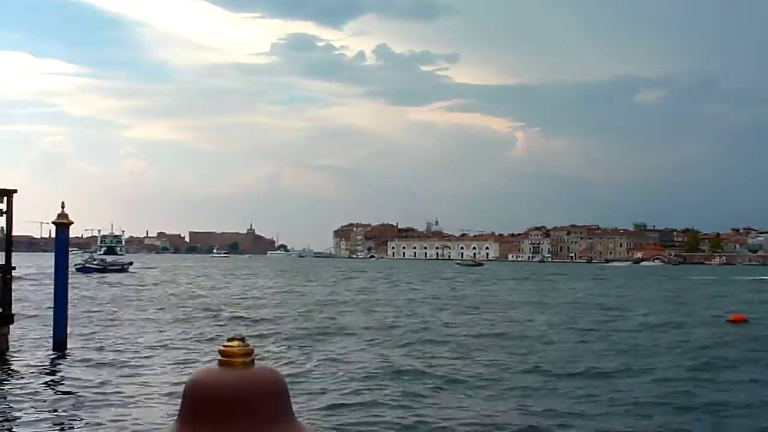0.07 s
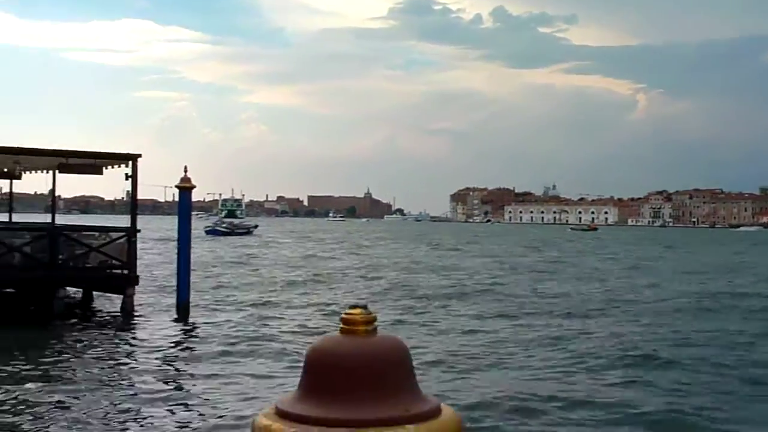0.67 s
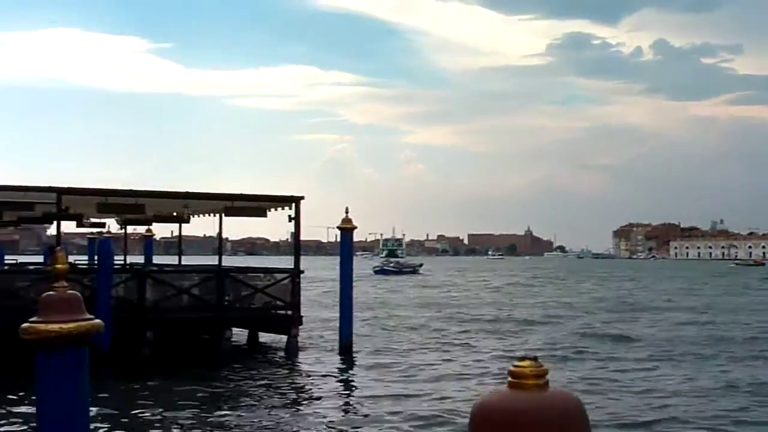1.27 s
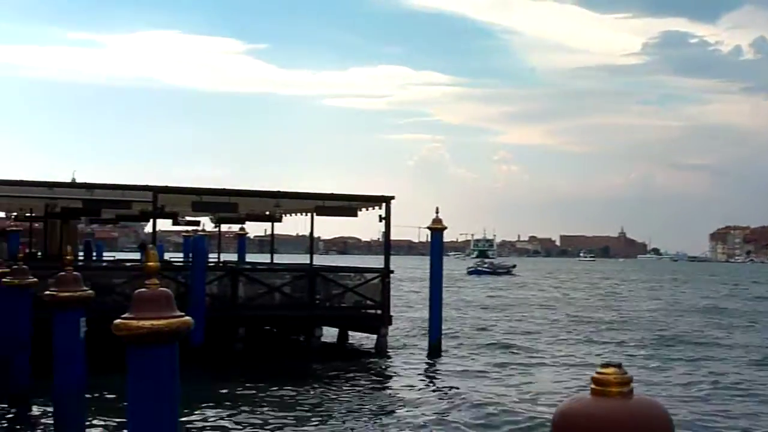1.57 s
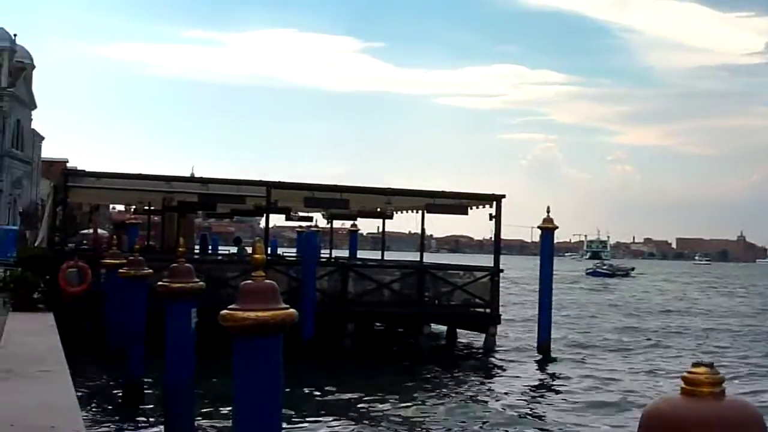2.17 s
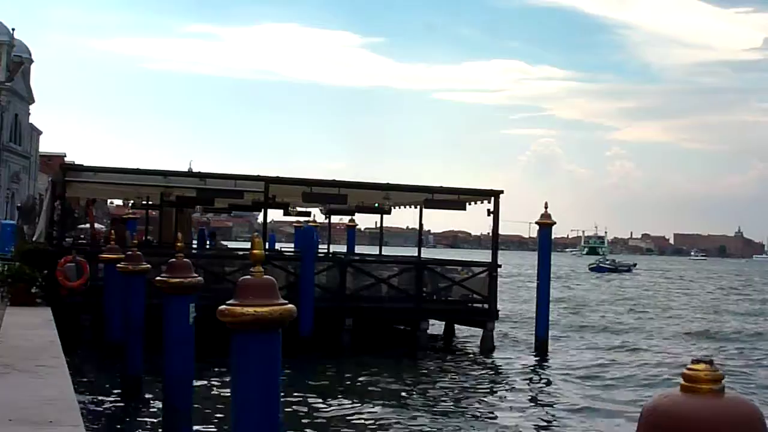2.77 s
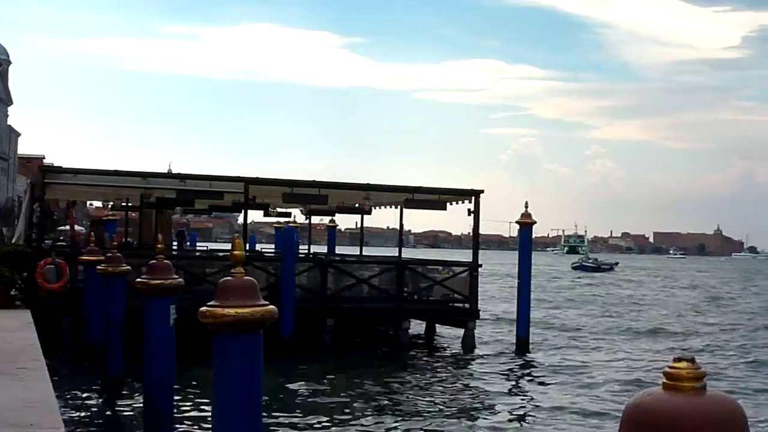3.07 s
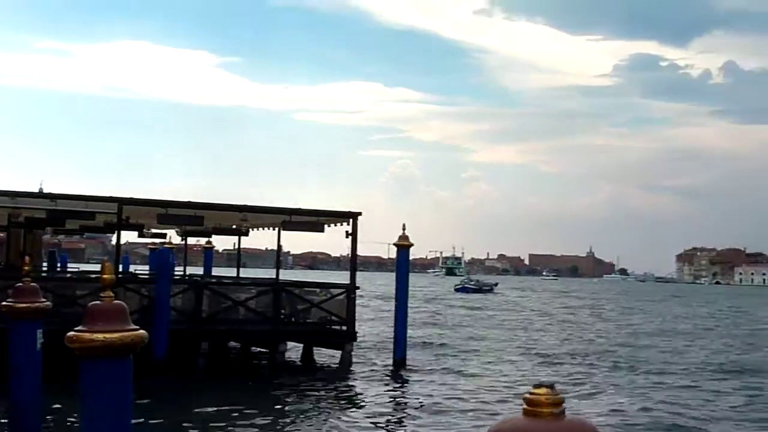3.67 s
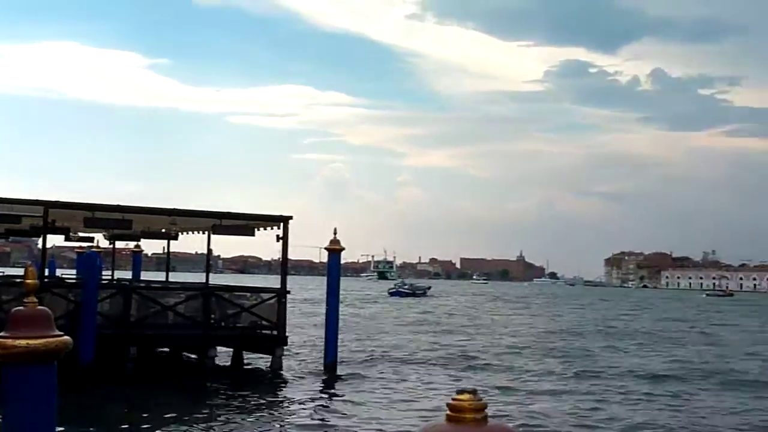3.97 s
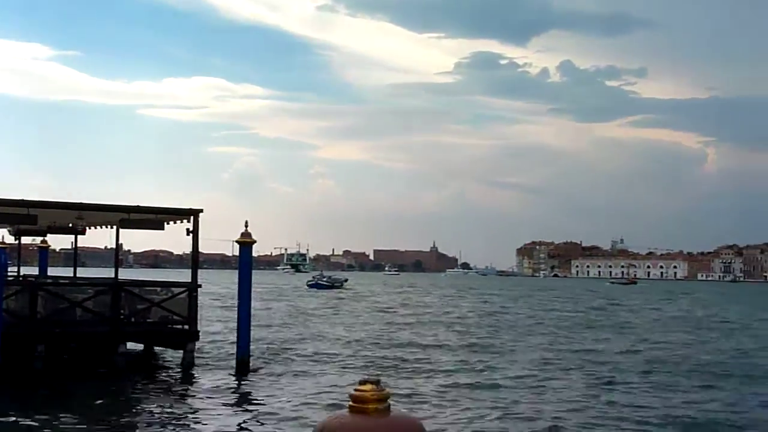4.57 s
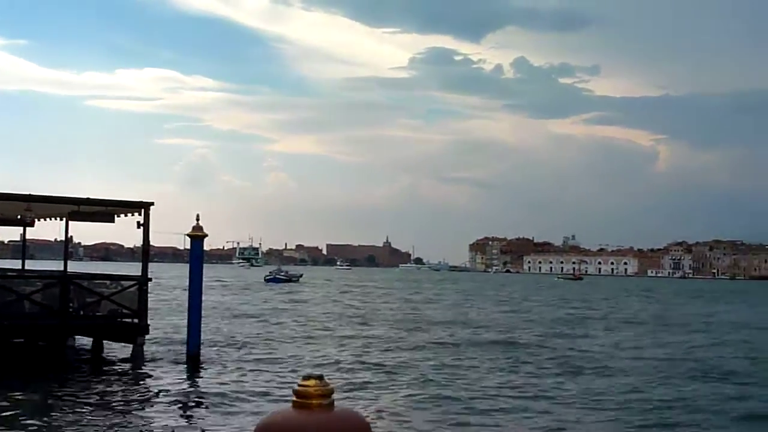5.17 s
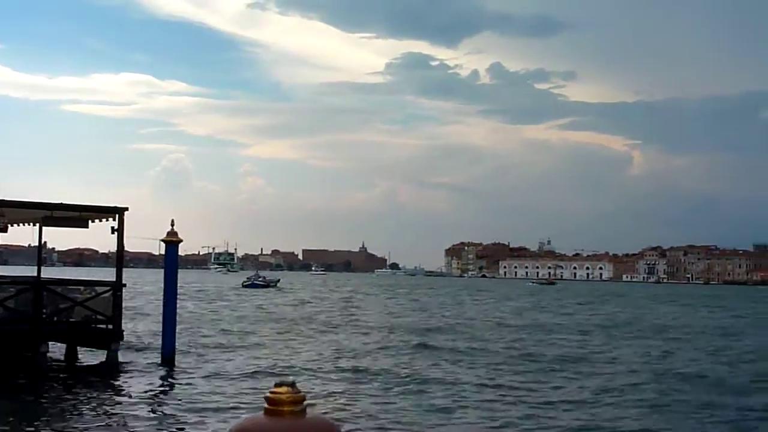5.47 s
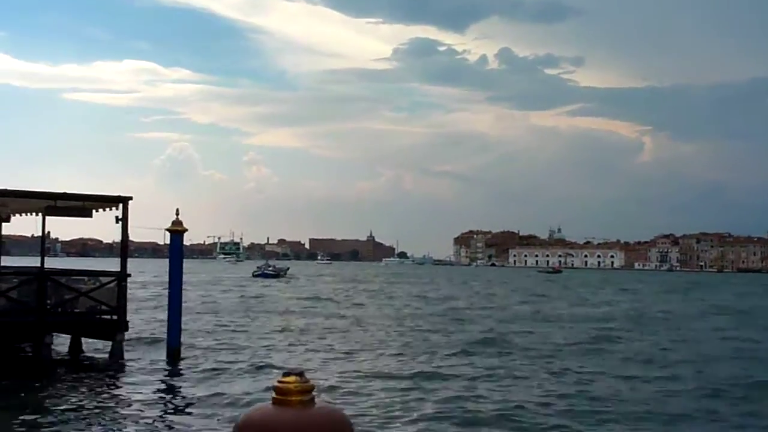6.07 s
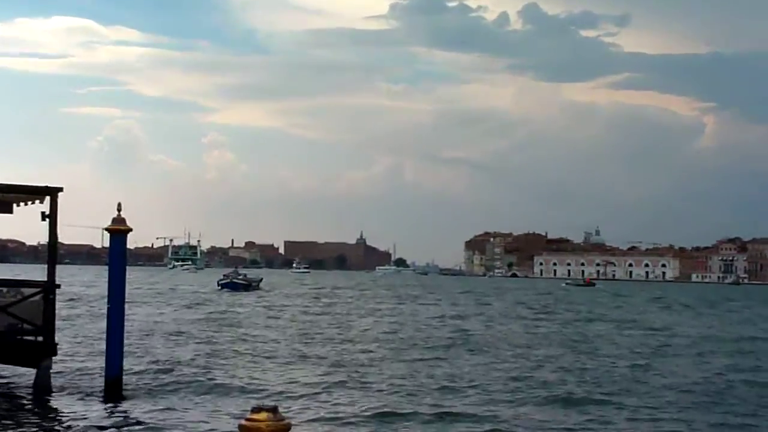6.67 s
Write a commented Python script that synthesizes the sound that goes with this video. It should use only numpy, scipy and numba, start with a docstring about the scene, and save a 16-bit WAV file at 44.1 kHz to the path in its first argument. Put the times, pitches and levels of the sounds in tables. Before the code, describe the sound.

Wind and diesel boats rumble steadily while small waves slap, plop and spatter around a wooden jetty.

```python
"""A quay on a choppy lagoon. From the start, wind and boat traffic rumble behind droning diesels.
About once a second a small wave swells round posts and a jetty and drains away in a haze of tiny
bubbles, with slaps, plops of trapped air and spatters of spray. At 4 s one boat opens its throttle
for a second. Near 6 s come a last cluster of plops and spatters and a louder gearbox whine."""
import sys
import numpy as np
from scipy import signal
from scipy.fft import rfft, irfft
from scipy.io import wavfile
from scipy.ndimage import map_coordinates
from numba import njit

SR = 44100
rng = np.random.default_rng(int(sys.argv[2]) if len(sys.argv) > 2 else 0)


def unload_audio(sound):
    """Save the sound as a 16-bit wav file, at the path given as the first command line argument."""
    columns = np.transpose(np.atleast_2d(sound))
    # keep every value between -1 and 1, then stretch to whole-number steps
    steps = np.round(np.clip(columns, -1, 1) * 32767)
    wavfile.write(sys.argv[1], SR, steps.astype(np.int16))


N = 300321
TIME_S = np.arange(N) / SR


def undb(db):
    """Decibels to gain."""
    return 10 ** (np.asarray(db) / 20)


def unit(x):
    """Scale to rms 1."""
    return x / np.sqrt(np.mean(x ** 2))


def curves(table):
    """Table columns, interpolated linearly in time."""
    times_s, *columns = np.transpose(table)
    return [np.interp(TIME_S, times_s, column) for column in columns]


def colour(x, spectrum):
    """Filter by (f/Hz, level/dB) points; rms 1."""
    hz, db = np.transpose(spectrum)
    bins_hz = np.maximum(np.fft.rfftfreq(N, 1 / SR), 1)
    gain = undb(np.interp(np.log(bins_hz), np.log(hz), db))
    return unit(irfft(rfft(x) * gain, N))


def walk(rate_hz):
    """Smooth random curve, rms 1."""
    steps = rng.standard_normal(size=2048)
    return unit(map_coordinates(steps, [TIME_S * rate_hz], order=3, mode="wrap"))


def add(out, t_s, x):
    """Mix x in at t_s."""
    start = max(int(t_s * SR), 0)
    out[start:start + len(x)] += x[:max(N - start, 0)]


# Roar: t/s, level/dB
ROAR_LEVEL = [(0, -33), (0.7, -30), (1.1, -32.5), (3.3, -31.5), (4.5, -31.5), (5.5, -34), (6.2, -30.5),
              (6.81, -32)]
# Gusts: t/s, level/dB, half-width/s
WIND_GUSTS = [(0.294, -36, 0.14), (1.64, -28, 0.068), (3.137, -34, 0.13), (3.452, -37, 0.11),
              (6.142, -29, 0.04), (6.556, -29.5, 0.041)]
# Spectra: f/Hz, level/dB
ROAR_SPECTRUM = [(10, -48.5), (22, -30), (35, -20), (52, -8.5), (75, -7.5), (103, 0), (135, -2), (190, -6),
                 (260, -6.5), (340, -12.5), (600, -22.5), (3000, -76)]
GUST_SPECTRUM = [(25, -20.5), (55, -14), (100, 0.5), (150, -11.5), (300, -26), (2000, -86.5)]

def rumble():
    """Wind and far engines merge into a low roar; gusts buffet the microphone."""
    level_db, = curves(ROAR_LEVEL)
    roar = colour(rng.standard_normal(N), ROAR_SPECTRUM) * undb(level_db)
    gust_gain = sum(undb(db) * np.exp(-((TIME_S - t_s) / width_s) ** 2) for t_s, db, width_s in WIND_GUSTS)
    return roar + gust_gain * colour(rng.standard_normal(N), GUST_SPECTRUM)


def engine(hz, orders, wander, flutter_db=1.0, flutter_hz=12):
    """Harmonics of a wavering shaft speed; each fades in and out on its way over the water."""
    phase = 2 * np.pi * np.cumsum(hz * (1 + wander * walk(9))) / SR
    out = np.zeros(N)
    for order, db in orders:
        rms = undb(db + flutter_db * walk(flutter_hz))
        out += np.sqrt(2) * rms * np.sin(order * phase + 2 * np.pi * rng.random())
    return out


# Diesel drone: t/s, level/dB
DIESEL_LEVEL = [(0, -41), (0.4, -34.5), (1.8, -35.5), (3.15, -31), (4.2, -32.5), (4.43, -40.5),
                (4.68, -31.5), (5.05, -40), (5.63, -34), (5.9, -42.5), (6.81, -37.5)]
# Firing harmonics: order, level/dB
FERRY_HARMONICS = [(1, -12.5), (2, -13.5), (3, -12.5), (4, -4)]
LAUNCH_HARMONICS = [(2, -19.5), (4, -3.5)]

def diesels():
    """Two diesels with close firing rates beat against each other."""
    level_db, = curves(DIESEL_LEVEL)
    ferry = engine(hz=58.8, orders=FERRY_HARMONICS, wander=0.0029, flutter_db=1.2, flutter_hz=15)
    launch = engine(hz=54.7, orders=LAUNCH_HARMONICS, wander=0.0037)
    return (ferry + launch) * undb(level_db)


# Whine: t/s, level/dB
GEAR_LEVEL = [(0, -59.5), (1.5, -48), (2.5, -50.5), (4.9, -48), (6.4, -39), (6.81, -48)]
# Whine harmonics: order, level/dB
GEAR_HARMONICS = [(1, -2), (2, -11.5), (3, -11.5), (4, -16), (6, -15)]

def gearbox():
    """A gearbox whines at near-constant pitch."""
    level_db, = curves(GEAR_LEVEL)
    return engine(hz=294.6, orders=GEAR_HARMONICS, wander=0.0021, flutter_db=1.5) * undb(level_db)


# Throttle run: t/s, firing f/Hz, level/dB
REV_RUN = [(4.05, 39, -41), (4.2, 42.4, -33.5), (4.32, 46.2, -30), (4.47, 52.93, -27), (4.7, 54.75, -25),
           (4.92, 55.87, -27), (5.1, 55.7, -28.5), (5.22, 56, -38)]
# Firing harmonics: order, level/dB
REV_HARMONICS = [(1, -12.5), (2, -1.5), (3, -13.5), (4, -19)]

def revving_boat():
    """A third engine speeds up, louder for a second."""
    firing_hz, level_db = curves(REV_RUN)
    return engine(firing_hz, REV_HARMONICS, wander=0.006) * undb(level_db)


@njit
def bubbles(samples, start_s, hz, cycles, amplitude, glide):
    """Each bubble rings for its cycles (to -60 dB), rising in pitch as it nears the surface."""
    out = np.zeros(samples)
    for k in range(len(start_s)):
        first, life = int(start_s[k] * SR), int(cycles[k] * SR / hz[k]) + 1
        step_rad = 2 * np.pi * hz[k] / SR
        phasor = amplitude[k] + 0j
        pole = np.exp(1j * step_rad - np.log(1000) / life)
        bend = np.exp(1j * step_rad * glide / life)
        for i in range(first, min(first + life, samples)):
            phasor, pole = phasor * pole, pole * bend
            out[i] += phasor.imag
    return out


def froth(low_hz, high_hz, cycles, spread_db, haze_db, count):
    """Many near bubbles, a few much louder than the rest, over the merged hiss of far ones."""
    when, pitch, ring, rank = rng.random((count, 4)).T
    hz = low_hz * (high_hz / low_hz) ** pitch
    amplitude = undb(-spread_db * np.log(rank + 0.012)) * hz / high_hz
    near = bubbles(N, when * N / SR, hz, cycles * (.5 + ring), amplitude, glide=0.14)
    return unit(near) + undb(haze_db) * rng.standard_normal(N)


# Far chop: t/s, level/dB
CHOP_LEVEL = [(0, -39), (1.28, -35), (2.1, -37.5), (2.9, -36.5), (4.5, -38), (4.95, -42), (5.25, -39.5),
              (5.45, -37.5), (5.8, -38), (6.5, -42), (6.81, -38)]
# Chop filter: f/Hz, level/dB
CHOP_EQ = [(100, -31.5), (270, -3), (350, -3.5), (480, -3), (630, -2), (900, -10), (2000, -19),
           (6000, -37.5), (8000, -57.5)]

def far_chop():
    """The chop further out merges into a dull, steady wash."""
    level_db, = curves(CHOP_LEVEL)
    wash = froth(low_hz=255.5, high_hz=1160, cycles=18, spread_db=2.9, haze_db=16.5, count=5000)
    return colour(wash, CHOP_EQ) * undb(level_db)


def quay_echo(x, echo_db, t60_s):
    """Posts, jetty and quay wall scatter each splash into a short tail."""
    t_s = np.arange(SR // 4) / SR
    tail = rng.standard_normal(len(t_s)) * undb(-60 * t_s / t60_s) * (t_s > .003)
    return x + undb(echo_db) * signal.fftconvolve(x, tail / np.linalg.norm(tail))[:N]


# Falling spray: t/s, peak level/dB, f/Hz
DROPS = [(0.704, -27, 2760), (0.7384, -22.5, 2440), (0.8794, -26.5, 3860), (0.9058, -24, 3100),
         (1.054, -44, 2570), (1.5103, -26.5, 2410), (2.253, -28, 4250), (4.2594, -27, 2950),
         (4.4577, -28, 3020), (6.2395, -25.5, 2900), (6.304, -22.5, 2550), (6.396, -30, 2710),
         (6.445, -26.5, 3430), (6.5323, -30, 2855), (6.572, -22, 2660)]

def spatters(scatter_oct, cycles, decay_s, lesser_db, count):
    """Spray lands as one large drop and a quickly thinning shower of lesser ones."""
    out = np.zeros(N)
    lesser = np.arange(count) > 0
    for t_s, db, hz in DROPS:
        when, pitch, rank = rng.random((count, 3)).T
        start_s = -decay_s * np.log(1 - when) * lesser
        drop_hz = hz * 2 ** (scatter_oct * (2 * pitch - .9) * lesser)
        amplitude = np.where(lesser, undb(lesser_db) * rank * (1 - when / 2), 1)
        shower = bubbles(SR // 4, start_s, drop_hz, np.full(count, cycles), amplitude, glide=.1)
        add(out, t_s, shower * undb(db) / np.abs(shower).max())
    return out


# Air trapped by waves, deep glugs to bright drips: t/s, level/dB, f/Hz
AIR_POCKETS = [(0.282, -24, 676), (0.534, -29, 1460), (0.736, -27, 1410), (0.791, -25, 497),
               (1.009, -24.5, 1085), (1.051, -20, 1730), (1.114, -22.5, 1110), (1.126, -26, 1740),
               (1.161, -25, 1100), (1.252, -24, 1530), (1.293, -18.5, 1370), (1.311, -23.5, 676),
               (2.033, -29.5, 4170), (2.179, -28, 3050), (2.353, -28, 1096), (2.727, -29.5, 4820),
               (2.744, -23.5, 780), (2.911, -19, 600), (2.994, -33, 4470), (4.039, -26.5, 720),
               (5.8, -23, 565), (6.062, -28.5, 1410), (6.157, -28.5, 1160), (6.24, -23.5, 1145),
               (6.288, -22.5, 1760), (6.307, -23.5, 2580), (6.765, -26, 1460)]

def plops(attack_s, ring_1khz_s, glide, shed_db, shed_s, count):
    """Each air pocket pinches off, rings and sheds a few bubbles just afterwards."""
    out = np.zeros(N)
    pinch = 1 - np.exp(-np.arange(SR // 4) / SR / attack_s)
    shed = np.arange(count) > 0
    for t_s, db, hz in AIR_POCKETS:
        when, pitch = rng.random((count, 2)).T
        bubble_hz = hz * (1 - glide / 5) * 2 ** ((pitch - .45) * shed)
        cycles = ring_1khz_s * bubble_hz * (1000 / bubble_hz) ** 0.3  # small bubbles die sooner
        plop = bubbles(SR // 4, shed_s * when * shed, bubble_hz, cycles, undb(shed_db * shed), glide)
        add(out, t_s, pinch * plop * undb(db))
    return out


# Waves: crest t/s, wash level/dB, spray level/dB, swell/s, drain/s
CRESTS = [(0.55, -41.5, -50.5, 0.72, 0.88), (1.4, -40.5, -48, 0.38, 0.85), (2.34, -42, -45.5, 0.31, 0.63),
          (3.37, -41, -46.5, 0.15, 0.58), (4.539, -41.5, -48.5, 0.66, 0.15), (5.67, -41, -46.5, 0.15, .3),
          (6.761, -40.5, -49, 0.41, .5)]
# Crests slapping a post: t/s, wash level/dB, spray level/dB, half-width/s
POST_SLAPS = [(0.418, -38, -57, 0.017), (0.745, -35, -43, 0.0062), (0.908, -46, -43.5, 0.05),
              (1.05, -41, -40.5, 0.03), (2.104, -35, -69, 0.025), (2.266, -57, -35.5, 0.034),
              (2.377, -37, -50, 0.046), (2.73, -41, -45, 0.021), (3.46, -46, -41.5, 0.023),
              (6.139, -58, -43, 0.017), (6.29, -36, -50, 0.051)]

def surge(calm_wash_db, calm_spray_db):
    """Wash and spray levels in dB: waves swell and drain over calm ripples, slaps add bursts."""
    power = undb([[calm_wash_db], [calm_spray_db]]) ** 2
    for t_s, wash_db, spray_db, swell_s, drain_s in CRESTS:
        age_s = TIME_S - t_s
        envelope = np.exp(-np.where(age_s < 0, (age_s / swell_s) ** 2, age_s / drain_s))
        power = power + (undb([[wash_db], [spray_db]]) * envelope) ** 2
    for t_s, wash_db, spray_db, width_s in POST_SLAPS:
        envelope = np.exp(-((TIME_S - t_s) / width_s) ** 2)
        power = power + (undb([[wash_db], [spray_db]]) * envelope) ** 2
    return 10 * np.log10(power)


# Wash and spray filters: f/Hz, level/dB
WASH_EQ = [(350, -10), (700, -3), (1200, 1.5), (1700, -1.5), (2500, -6.5), (3500, -13.5), (5000, -26.5),
           (7500, -46)]
SPRAY_EQ = [(1200, -9), (2400, 2), (3300, 0.5), (4700, -1), (5700, -7), (6500, -14.5), (7100, -24),
            (7800, -36)]

def lapping():
    """Each wave swells the gurgling wash and throws up finer spray, both in uneven spurts."""
    wash_db, spray_db = surge(calm_wash_db=-48.5, calm_spray_db=-52.5)
    spurt = walk(rate_hz=45)
    wash = froth(low_hz=493, high_hz=4590, cycles=27, spread_db=3.0, haze_db=7, count=5000)
    spray = froth(low_hz=2000, high_hz=7500, cycles=29, spread_db=4.0, haze_db=6.5, count=7000)
    return (colour(wash, WASH_EQ) * undb(wash_db + 0.54 * spurt)
            + colour(spray, SPRAY_EQ) * undb(spray_db + 0.5 * spurt))


def scene():
    """Near water in front of boats and wind; mono."""
    pockets = plops(attack_s=0.001, ring_1khz_s=0.031, glide=0.082, shed_db=-11, shed_s=0.013, count=4)
    drops = spatters(scatter_oct=0.61, cycles=17.4, decay_s=0.0034, lesser_db=-6, count=20)
    splashes = quay_echo(pockets + drops, echo_db=-10.5, t60_s=0.069)
    water = lapping() + splashes + far_chop()
    boats = diesels() + gearbox() + revving_boat()
    return (water + boats + rumble())[None]


def record(dry):
    """A small camera drops the deepest bass and cuts the treble steeply."""
    low_hz, top_hz = 22, 7350
    highpass = signal.butter(2, low_hz, "highpass", fs=SR, output="sos")
    lowpass = signal.ellip(10, .2, 75, top_hz, fs=SR, output="sos")
    return signal.sosfilt(lowpass, signal.sosfilt(highpass, dry))


dry = scene()
out = record(dry)
unload_audio(out)
```